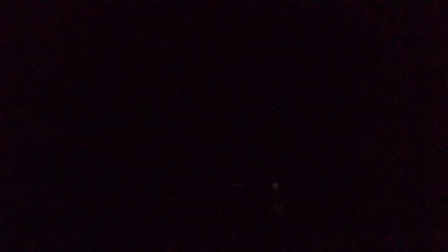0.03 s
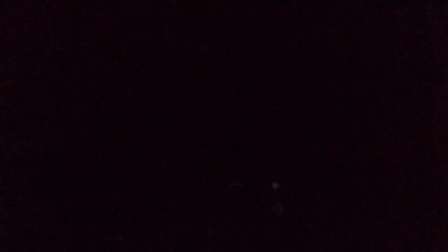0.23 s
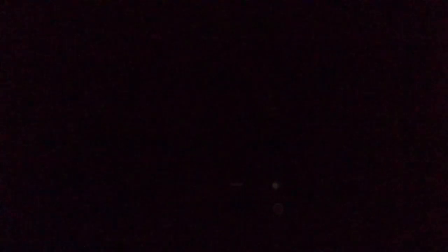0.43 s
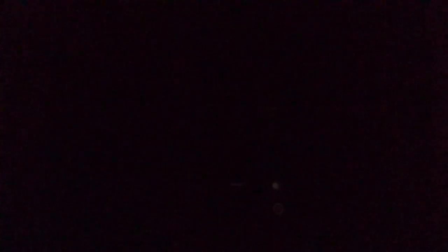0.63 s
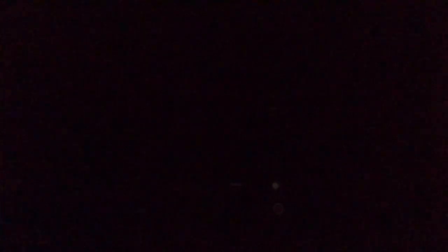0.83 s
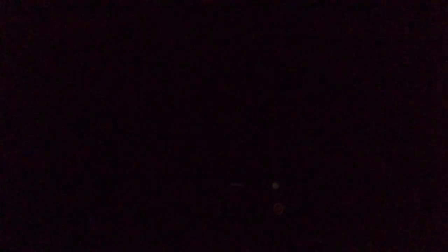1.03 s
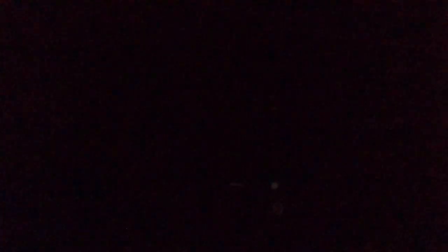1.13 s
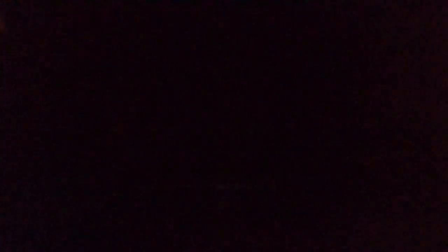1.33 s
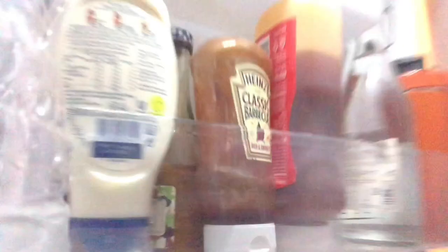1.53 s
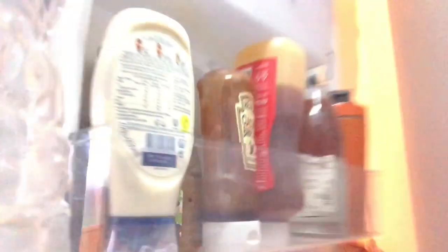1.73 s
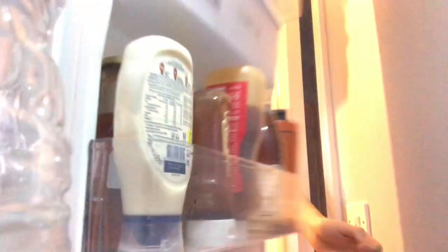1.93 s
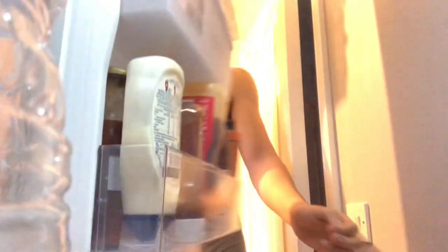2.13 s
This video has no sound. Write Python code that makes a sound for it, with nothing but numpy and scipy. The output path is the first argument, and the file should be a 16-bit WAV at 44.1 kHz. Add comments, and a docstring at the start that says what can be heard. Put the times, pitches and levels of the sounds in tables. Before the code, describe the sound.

A refrigerator door pulled open with a loud, booming clunk and rattle over a low hum.

```python
"""Refrigerator door, from inside.

The compressor hums. A hand takes the door; the seal creaks, peels and lets go with a clunk that booms
through the cabinet. Bottles clink and jars ring in the rack, kitchen noise comes in, the plastic
ticks as the door swings out, and a last dull bump sets a panel drumming."""
import sys
import numpy as np
from scipy import signal
from scipy.fft import rfft, irfft, next_fast_len
from scipy.io import wavfile
from scipy.ndimage import uniform_filter1d

SR = 44100
rng = np.random.default_rng(int(sys.argv[2]) if len(sys.argv) > 2 else 0)


def generate_wav(sig):
    """Save sig (samples, or channels by samples) to the path in sys.argv[1] as 16-bit PCM at SR."""
    pcm = np.round(np.clip(np.atleast_2d(sig).T, -1, 1) * 32767).astype(np.int16)
    wavfile.write(sys.argv[1], SR, pcm)


N = 95961
ATTACK_S = .002


def undb(db):
    """Decibels to gain."""
    return 10 ** (np.asarray(db) / 20)


def clock():
    """Time of each sample in seconds."""
    return np.arange(N) / SR


def colour(x, points):
    """Filter by (Hz, dB) points, roll off below the first, scale to rms 1."""
    hz, db = np.array(points).T
    size = next_fast_len(N, True)
    bin_hz = np.maximum(np.arange(size // 2 + 1) * SR / size, 1)
    gain = undb(np.interp(np.log(bin_hz), np.log(hz), db))
    low_cut = np.sqrt(1 + (hz[0] / bin_hz / 2) ** 4)
    y = irfft(rfft(x, size) * gain / low_cut, size)[:N]
    return y / y.std()


def noise(points):
    """Coloured noise of rms 1."""
    return colour(rng.standard_normal(N), points)


def strike(at, rise_s, t60_s, hold_s=0):
    """Envelope: rise, hold until hold_s after the start, exponential decay."""
    age = np.maximum(clock() - at, 0)
    onset = np.sin(np.pi / 2 * np.minimum(age / rise_s, 1)) ** 2
    return onset * np.exp(-np.log(1000) * np.maximum(age - max(rise_s, hold_s), 0) / t60_s)


def tone(at, hz):
    """Sine of rms 1 with zero phase at the given time."""
    return np.sqrt(2) * np.sin(2 * np.pi * hz * (clock() - at))


def force(hits):
    """One impulse at each (s, dB)."""
    pushes = np.zeros(N)
    for at, db in hits:
        pushes[int(at * SR)] += undb(db)
    return pushes


def ring(hits, modes):
    """Strike (Hz, dB, t60 s) modes at each (s, dB)."""
    response = sum(undb(db) * tone(0, hz) * strike(0, ATTACK_S, t60) for hz, db, t60 in modes)
    return signal.fftconvolve(force(hits), response)[:N]


def smear(x, tail):
    """Spread a sound over a tail of unit energy."""
    return signal.fftconvolve(x, tail / np.sqrt(np.sum(tail ** 2)))[:N]


# Hum levels. Each row: time in seconds, mains line in dB, its octave in dB.
HUM_LEVELS = [(.08, -42.5, -40), (.59, -44.5, -39.5), (.71, -52, -47.5), (.85, -52, -48),
              (1.0, -48.5, -53.5), (1.2, -47.5, -50.5), (1.55, -53.5, -52.5), (1.7, -60.5, -46),
              (1.83, -65, -41.5), (2.05, -68, -47.5)]
# Air and motor noise. Each row: frequency in Hz, relative density in dB.
AIR_SPECTRUM = [(30, -7), (90, -1.5), (160, -5.5), (300, -3.5), (600, -14), (1000, -11.5), (2000, -22.5),
                (2800, -25), (3600, -22), (6000, -28.5), (9000, -35), (15000, -42.5)]
MAINS_HZ, AIR_DB = 50, -59


def compressor():
    """Mains hum and its octave over a soft rush of air."""
    times, mains_db, octave_db = np.array(HUM_LEVELS).T
    mains = undb(np.interp(clock(), times, mains_db)) * tone(0, MAINS_HZ)
    octave = undb(np.interp(clock(), times, octave_db)) * tone(0, 2 * MAINS_HZ)
    return mains + octave + undb(AIR_DB) * noise(AIR_SPECTRUM)


# Air booms. Each row: start in seconds, pitch in Hz, level in dB, rise and t60 in seconds.
AIR_BOOMS = [(0.599, 63, -29.5, 0.014, 0.12), (0.668, 58, -32, 0.011, 0.066), (.815, 48, -37, 0.019, 0.088),
             (1.231, 76, -38, 0.09, 0.22), (1.267, 66, -13.5, .015, 0.13), (1.317, 58, -14, 0.0066, 0.29),
             (1.426, 62.4, -21.5, 0.012, 0.22), (1.49, 85.7, -40, 0.016, 1)]


def boom():
    """The enclosed air swings as the door moves."""
    return sum(undb(db) * tone(at, hz) * strike(at, rise, t60) for at, hz, db, rise, t60 in AIR_BOOMS)


# Nudges of the hand. Each row: start in seconds, force in dB.
NUDGES = [(.603, -36), (.622, -48.5), (.812, -49), (1.118, -40.5)]
# Cabinet modes. Each row: frequency in Hz, relative level in dB, t60 in seconds.
CABINET_MODES = [(126, -14, .25), (158, -7, .32), (230, -15, .22), (364, -12, .24), (400, -11, .18),
                 (504, -9, .15), (560, -4, .17), (618, -1, .15), (693, -13, .18), (817, -14, .13),
                 (942, -12, .14), (1090, -16, .15), (1284, -17, .18), (1440, -20, .19), (2120, -20, .15)]
# Hand rubbing the door. Each row: frequency in Hz, relative density in dB.
RUB_SPECTRUM = [(200, 17.5), (500, -5.5), (1200, 2), (2800, -7.5), (5000, -5.5), (7500, -18.5),
                (10000, -36), (16000, -33.5)]
NUDGE_CUTOFF_HZ, RUB_DB = 200, -58


def hand():
    """Soft nudges wake the cabinet's low modes; the grip rubs as it settles."""
    soften = signal.butter(4, NUDGE_CUTOFF_HZ, fs=SR, output="sos")
    nudges = signal.sosfilt(soften, ring(NUDGES, CABINET_MODES))
    rub = undb(RUB_DB) * noise(RUB_SPECTRUM) * strike(at=.81, rise_s=.03, t60_s=.6, hold_s=.11)
    return nudges + rub


# Reflections off liner and shelves. Each row: delay in ms, gain in dB.
LINER_ECHOES = [(1.7, -18), (2.9, -14), (4.6, -10), (7.3, -3.5)]


def boxed(x):
    """Close reflections comb the sound; rms 1."""
    y = x + sum(undb(db) * np.roll(x, int(ms * SR / 1000)) for ms, db in LINER_ECHOES)
    return y / y.std()


# Hollow body of the door. Each row: frequency in Hz, relative density in dB.
BODY_SPECTRUM = [(50, -21.5), (110, 0), (160, 6), (270, -1), (400, -1.5), (480, 0.5), (600, -0.5),
                 (760, -24.5), (1000, -22), (2000, -52.5)]
# Plastic clack. Each row: multiple of its pitch, relative density in dB.
CLACK_SPECTRUM = [(.32, -27), (.72, 1), (1, 9.5), (1.3, -2.5), (1.7, -5.5), (2.2, -4), (2.9, -21.5),
                  (5.2, -43)]
# Bright snap. Each row: frequency in Hz, relative density in dB.
SNAP_SPECTRUM = [(900, -12), (2200, 0.5), (3000, -0.5), (3700, 0.5), (5800, 1.5), (8000, -3.5), (9200, -9),
                 (10800, -6), (13000, -12), (16000, -12.5)]


def knocks(rows, body=BODY_SPECTRUM):
    """Dense, quickly damped ringing of plastic: hollow body, pitched clack and snap per contact."""
    hollow, snap = noise(body), boxed(noise(SNAP_SPECTRUM))
    out = 0
    for at, body_db, clack_db, clack_hz, snap_db, t60 in rows:
        clack = boxed(noise([(ratio * clack_hz, db) for ratio, db in CLACK_SPECTRUM]))
        contact = undb(body_db) * hollow + undb(clack_db) * clack + undb(snap_db) * snap
        out += strike(at, ATTACK_S, t60) * contact
    return out


# Light contacts. Each row: start in seconds, body in dB, clack in dB, clack pitch in Hz, snap in dB,
# t60 in seconds.
LIGHT_CONTACTS = [(.603, -47, -63.5, 423, -80, 0.12), (.809, -44.5, -49, 1000, -60, .11),
                  (1.057, -62, -59, 1000, -53.5, 0.2), (1.075, -47, -54, 1000, -77, 0.047),
                  (1.1155, -30, -34, 1150, -51.5, .075), (1.157, -35, -40, 1000, -47.5, 0.1),
                  (1.1715, -30.5, -34.5, 600, -60.5, 0.074), (1.654, -50.5, -48, 1200, -66, 0.11),
                  (1.8645, -44.5, -47.5, 1200, -51, 0.065), (1.9055, -53, -42, 780, -72, 0.054)]


def ticks():
    """Handle, seal and plastic creak and tick."""
    return knocks(LIGHT_CONTACTS)


# Peeling gasket. Each row: frequency in Hz, relative density in dB.
PEEL_SPECTRUM = [(60, 11), (160, 1.5), (400, 5.5), (620, -1.5), (1000, -2.5), (2000, -14), (3200, -20),
                 (7500, -29.5), (10000, -33.5), (16000, -38)]
PEEL_S, RELEASE_S, RELEASE_DB, SWELL_DB_PER_S = 1.19, 1.2615, -13, 720
GRAIN_DEPTH, GRAIN_SAMPLES = .25, 16


def seal():
    """Tiny separations of the gasket swell up to the release."""
    hiss = rng.standard_normal(N)
    roughness = np.repeat(rng.standard_normal(N // GRAIN_SAMPLES + 1), GRAIN_SAMPLES)[:N]
    grains = colour(hiss * np.exp(GRAIN_DEPTH * roughness), PEEL_SPECTRUM)
    swell = undb(RELEASE_DB + SWELL_DB_PER_S * np.minimum(clock() - RELEASE_S, 0))
    return grains * swell * strike(PEEL_S, rise_s=.01, t60_s=.06, hold_s=RELEASE_S - PEEL_S)


# Blows of door and rack. Each row: start in seconds, cabinet drive in dB, body in dB, clack in dB,
# clack pitch in Hz, snap in dB, t60 in seconds.
DOOR_BLOWS = [(1.2620, -4.5, -16.5, -11.5, 926, -11.5, 0.038),
              (1.277, -14.5, -14, -19.5, 930, -26.5, 0.072), (1.290, -32, -8.5, -32, 800, -44, 0.05),
              (1.299, -38, -28, -29.5, 1170, -38, 0.15), (1.311, -28, -10.5, -15, 826, -44, 0.071),
              (1.320, -44, -16, -20.5, 930, -42, 0.017), (1.3675, -25, -25.5, -24.5, 1080, -33.5, 0.053),
              (1.374, -32.5, -24.5, -22.5, 980, -39, 0.072), (1.392, -39, -28.5, -34, 877, -52, 0.19),
              (1.4154, -32, -26.5, -23.5, 1540, -35.5, 0.079), (1.4215, -20, -17, -27.5, 894, -32.5, 0.092),
              (1.438, -30, -29, -24.5, 800, -46.5, 0.12), (1.452, -46, -19.5, -51, 900, -51, 0.043),
              (1.463, -50, -30.5, -38, 900, -44, 0.05)]
CABINET_GAIN_DB, CABINET_RISE_S = -5, .0017


def door():
    """The door jumps free, its rack rattles and the cabinet rings."""
    rattle = knocks([(at, *contact) for at, _, *contact in DOOR_BLOWS])
    return rattle + cabinet([row[:2] for row in DOOR_BLOWS])


def cabinet(hits):
    """Each blow adds energy to the cabinet's modes; it leaks away at each mode's own rate."""
    energy, first_s = force(hits) ** 2, hits[0][0]
    out = 0
    for hz, db, t60 in CABINET_MODES:
        retained = np.exp(-2 * np.log(1000) / (t60 * SR))
        stored = signal.lfilter([1], [1, -retained], energy)
        swing = uniform_filter1d(np.sqrt(stored), int(CABINET_RISE_S * SR))
        out += undb(db + CABINET_GAIN_DB) * swing * tone(first_s, hz)
    return out


# Bottle contacts. Each row: start in seconds, force in dB.
BOTTLE_HITS = [(1.422, -34)]
# Bottle modes. Each row: frequency in Hz, relative level in dB, t60 in seconds.
BOTTLE_MODES = [(2250, -7, .05), (3413, -7, .08), (3618, -15, .15), (5114, -7, .09), (5270, -5, .12),
                (8200, -1, .035), (9959, -4, .07), (13000, -4, .03), (14090, 4, .035), (14300, 1, .03)]
# Clicks of the swinging rack. Each row: start in seconds, force in dB.
RACK_HITS = [(1.654, -60.5), (1.8645, -59.5)]
# Rack modes. Each row: frequency in Hz, relative level in dB, t60 in seconds.
RACK_MODES = [(1330, -3, .07), (2480, 0, .07), (2750, -3, .05), (3550, -4, .05), (4550, -5, .05),
              (5350, -3, .05), (6700, -8, .04), (10000, -10, .05)]
CHATTER_GAIN_DB, CHATTER_T60_S = 2, .03


def rack():
    """Bottles clink and plastic clicks, each contact chattering in many tiny touches."""
    clean = ring(BOTTLE_HITS, BOTTLE_MODES) + ring(RACK_HITS, RACK_MODES)
    touches = rng.standard_normal(N) * strike(0, ATTACK_S, CHATTER_T60_S)
    return clean + undb(CHATTER_GAIN_DB) * smear(clean, touches)


# Ringing jars. Each row: start in seconds, pitch in Hz, level in dB, t60 in seconds.
JAR_TONES = [(1.425, 1787, -45, .42), (1.425, 1750, -52, .45), (1.515, 481, -48, .38),
             (1.585, 1066, -58, .55), (1.645, 452, -54, .5)]
JAR_RISE_S = .015


def jars():
    """Jars ring faintly after the rattle."""
    return sum(undb(db) * tone(at, hz) * strike(at, JAR_RISE_S, t60) for at, hz, db, t60 in JAR_TONES)


# Kitchen noise. Each row: frequency in Hz, relative density in dB.
KITCHEN_SPECTRUM = [(110, -14.5), (200, 3), (300, -0.5), (450, -5.5), (700, -16.5), (1300, -19),
                    (3000, -39.5)]
KITCHEN_DB, OPEN_S, OPEN_FADE_S = -57, 1.54, .089


def kitchen():
    """Room noise comes in through the widening gap."""
    gap = np.clip((clock() - OPEN_S) / OPEN_FADE_S, 0, 1)
    return undb(KITCHEN_DB) * noise(KITCHEN_SPECTRUM) * gap


# Contacts of the last bump. Each row: start in seconds, body in dB, clack in dB, clack pitch in Hz,
# snap in dB, t60 in seconds.
BUMP_CONTACTS = [(2.0635, -23.5, -34.5, 750, -65, 0.079), (2.074, -25, -41.5, 940, -52, .14),
                 (2.104, -26, -44, 810, -74, 0.15), (2.131, -33.5, -53, 910, -70, 0.15)]
# Hollow body of the bump. Each row: frequency in Hz, relative density in dB.
BUMP_SPECTRUM = [(80, -17.5), (150, -4.5), (240, 6), (310, -5), (450, -7), (650, -23), (1000, -25),
                 (2000, -46.5)]
PANEL_S, PANEL_HZ, PANEL_DB = 2.066, 94.2, -16.5


def bump():
    """Dull knocks and a briefly drumming panel."""
    envelope = strike(PANEL_S, rise_s=.018, t60_s=.14, hold_s=.064)
    panel = undb(PANEL_DB) * tone(PANEL_S, PANEL_HZ) * envelope
    return panel + knocks(BUMP_CONTACTS, BUMP_SPECTRUM)


# Room reverberation. Each row: frequency in Hz, relative density in dB.
ROOM_SPECTRUM = [(80, -7), (200, 9.5), (500, -8.5), (1200, 2), (2500, -3.5), (6000, -11.5), (16000, -18)]
ROOM_GAIN_DB, ROOM_T60_S = -29.5, .7


def room(x):
    """The room returns a faint tail."""
    tail = noise(ROOM_SPECTRUM) * strike(0, rise_s=.013, t60_s=ROOM_T60_S)
    return undb(ROOM_GAIN_DB) * smear(x, tail)


def scene():
    """Contact sounds and their room tail over booms, hum and kitchen noise; mono."""
    near = door() + rack() + jars() + seal() + ticks() + bump() + hand()
    return (near + room(near) + boom() + compressor() + kitchen())[None]


MIC_ON_S, MIC_FADE_S = .081, .002
LOW_CUT_HZ, HIGH_CUT_HZ, CEILING = 40, 15600, .92


def record(dry):
    """The microphone opens after a moment, sheds rumble, rounds the loudest peaks and cuts the top."""
    opened = np.clip((clock() - MIC_ON_S) / MIC_FADE_S, 0, 1)
    thin = signal.sosfilt(signal.butter(4, LOW_CUT_HZ, "high", fs=SR, output="sos"), dry)
    rounded = thin / (1 + (thin / CEILING) ** 6) ** (1 / 6)
    return signal.sosfilt(signal.ellip(10, .2, 80, HIGH_CUT_HZ, fs=SR, output="sos"), rounded * opened)


dry = scene()
out = record(dry)
generate_wav(out)
```